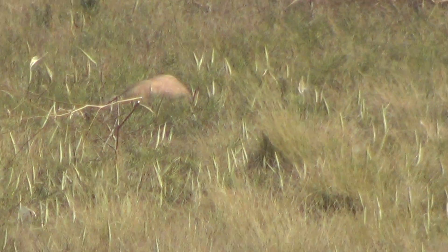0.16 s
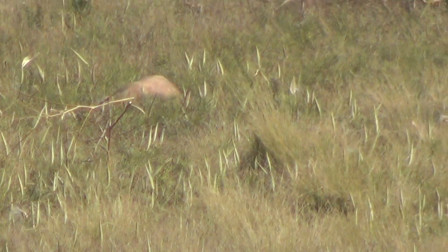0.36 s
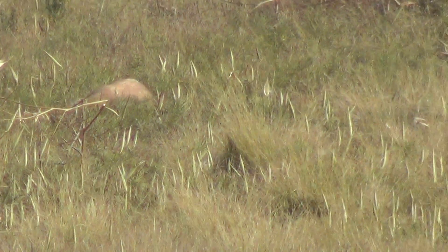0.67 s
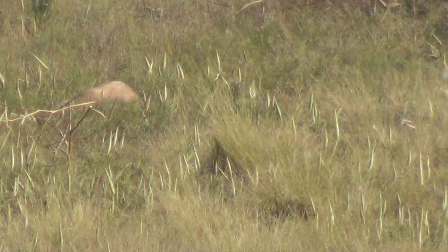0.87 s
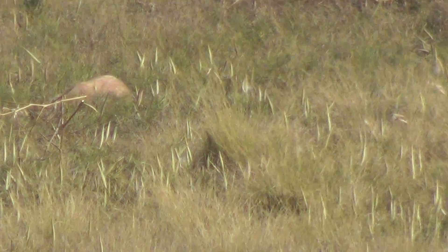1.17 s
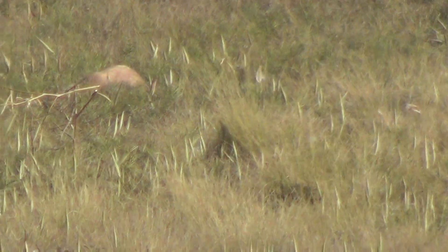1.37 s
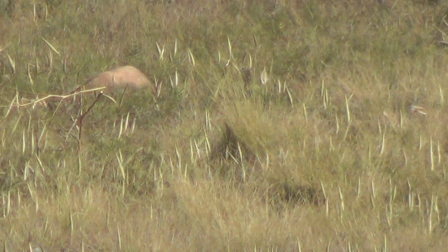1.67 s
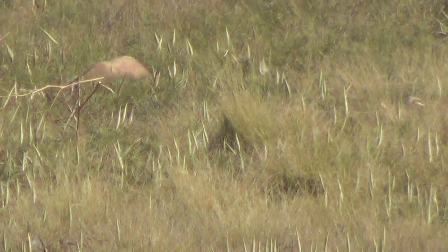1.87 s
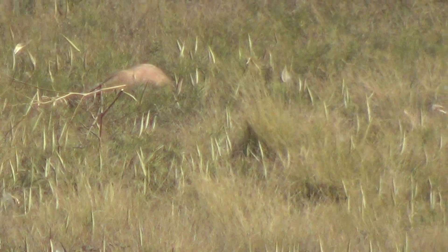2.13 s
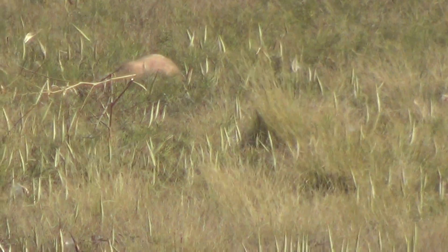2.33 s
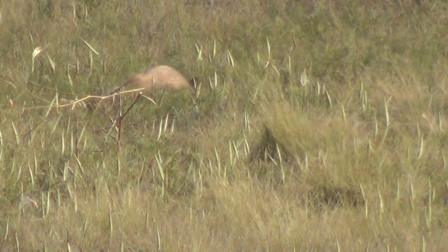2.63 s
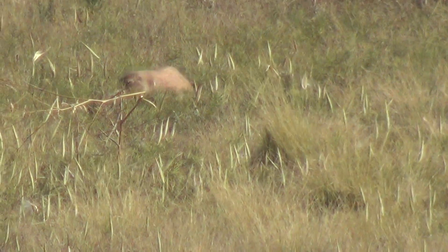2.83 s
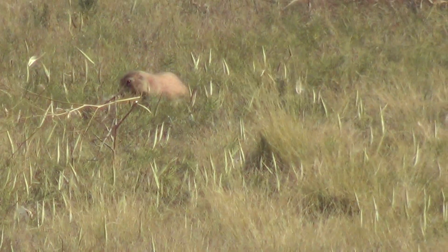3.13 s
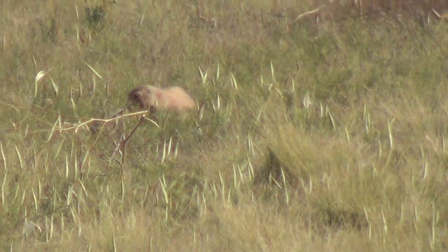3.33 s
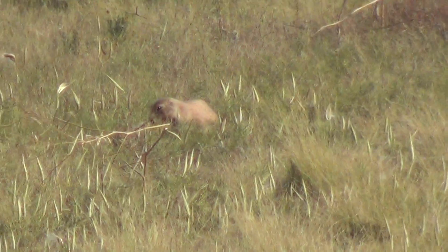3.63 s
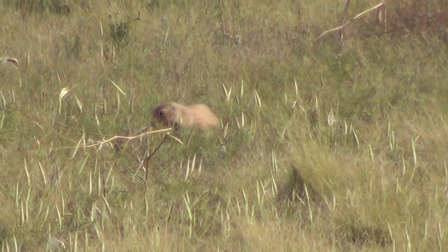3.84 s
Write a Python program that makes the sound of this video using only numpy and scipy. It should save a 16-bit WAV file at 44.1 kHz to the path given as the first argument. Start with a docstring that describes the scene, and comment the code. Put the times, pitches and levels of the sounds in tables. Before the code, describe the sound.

One harsh, arched prairie dog bark over low wind buffeting, faint distant yips and handling clicks

```python
"""Open grassland: gusts buffet the microphone throughout, as low noise over a slowly rising rush of wind.
Two faint arched yips come early from farther off, then the hand-held camera ticks and its grip rubs.
At 2.3 s a prairie dog gives one harsh, arched bark: jittery vocal folds and air through a throat filter.
A farther squeal falls at 2.7 s and a last yip follows; at 3.65 s the camera snaps, one brief high ring.
The camera's own noise hiss and thin high whine run underneath from start to end."""
import sys
import numpy as np
from scipy import signal
from scipy.fft import rfft, irfft
from scipy.io import wavfile
from scipy.ndimage import uniform_filter1d

SR = 44100
rng = np.random.default_rng(int(sys.argv[2]) if len(sys.argv) > 2 else 0)


def wav_out(sig):
    """Save sig, one row per channel (or a flat mono array), as 16-bit PCM at SR to the path in sys.argv[1]."""
    wavfile.write(sys.argv[1], SR, np.round(np.clip(np.atleast_2d(sig).T, -1, 1) * 32767).astype(np.int16))


N = 176400
TIME = np.arange(N) / SR
BIN_HZ = np.arange(N // 2 + 1) * SR / N
CUTOFF_HZ = 16500  # top of the camera's sound


# pitch arch of the near bark: start_s, pitch_hz
BARK_PITCH = [(2.298, 1440), (2.312, 1741), (2.326, 1938), (2.352, 1995), (2.378, 2110), (2.41, 1985),
              (2.427, 1743), (2.44, 1270)]
# effort of the near bark: start_s, level_db, roughness (0-1)
BARK_EFFORT = [(2.296, -74, 0.07), (2.304, -45, 0.28), (2.325, -48, 0.33), (2.345, -46, 0.4),
               (2.356, -46, 0.95), (2.385, -45.5, 0.7), (2.408, -47, 0.65), (2.43, -51.5, 0.37),
               (2.441, -58, 0.3)]
# vocal-fold harmonics of the bark, first to fourth, against each other: level_db
BARK_HARMONICS = [15.5, 2.5, -1, -27]
BARK_PAN_DB = -3  # left minus right


def bark():
    """The near bark: clearer on the way up, harsh and airy at the top of its arch."""
    pitch_hz, = in_time(BARK_PITCH)
    level_db, rough = in_time(BARK_EFFORT)
    call = cry(pitch_hz, level_db, rough, BARK_HARMONICS, BARK_EFFORT[0][0])
    return call * during(BARK_EFFORT) * pan(BARK_PAN_DB)


# throat resonances, as relative tone colour: centre_hz, gain_db
THROAT = [(700, -23), (2100, -4.5), (2900, 11), (3900, 6.5), (5000, -3.5), (6850, 2.5), (7500, -22)]
AIR_DB = -6  # breath noise at full roughness, against the folds, before the throat
# the throat's rasping upper resonance: pitch at the onset, sinking speed, strength at full roughness
UPPER_HZ, UPPER_SAG_HZ_PER_S, UPPER_DB = 6800, 6500, -7.5


def cry(pitch_hz, level_db, rough, harmonics_db, onset_s):
    """Folds and turbulent air sound through the throat; a rasping upper resonance sinks as the call goes on."""
    upper_hz = UPPER_HZ - UPPER_SAG_HZ_PER_S * (TIME - onset_s)
    upper_carrier = np.exp(2j * np.pi * np.cumsum(upper_hz) / SR)
    upper = from_db(UPPER_DB) * np.real(chaos() * upper_carrier)
    breath = from_db(AIR_DB) * rng.standard_normal(N)
    turbulence = np.clip(rough, 0, 1) * (breath + upper)
    sound = colour(voice(pitch_hz, rough, harmonics_db) + turbulence, THROAT)
    # even out the throat's own level, so that the effort curve alone sets it
    running_rms = np.sqrt(uniform_filter1d(sound ** 2, size=400) + 1e-9)
    return from_db(level_db) * sound / running_rms


JITTER, JITTER_HZ = .021, 240  # pitch wander at full roughness (share of the pitch), and its speed
RASP_WIDTH_HZ = 310  # speed of the chaotic wander


def voice(pitch_hz, rough, harmonics_db):
    """Vocal folds: growing roughness breaks harmonics into chaotic bands at their pitch, the upper ones first."""
    rough = np.clip(rough, 0, 1)
    wobble = 1 + JITTER * np.sqrt(rough) * drift(JITTER_HZ)
    phase = 2 * np.pi * np.cumsum(pitch_hz * wobble) / SR
    out = 0
    for k, db in enumerate(harmonics_db, 1):
        broken = rough ** (1 / np.sqrt(k))
        strength = np.sqrt(1 - broken ** 2) + broken * chaos()
        out = out + from_db(db) * np.real(strength * np.exp(1j * k * phase))
    return rms_one(out)


def chaos():
    """Fast random wander of strength and phase; unit power."""
    return rms_one(drift(RASP_WIDTH_HZ) + 1j * drift(RASP_WIDTH_HZ))


# farther squeal that starts hoarse and falls: start_s, pitch_hz, level_db (direct sound), roughness (0-1)
SQUEAL = [(2.725, 1400, -70, .6), (2.752, 1580, -58.5, .8), (2.77, 1600, -57.5, .8), (2.779, 1430, -59, .2),
          (2.81, 1455, -54.5, .12), (2.85, 1380, -60, .2), (2.905, 1260, -66, .2)]
# harmonics of the squeal, first to fourth, against each other: level_db
SQUEAL_HARMONICS = [9, -9, -17, -15]
# distant yips: middle_s, length_s, pitch_hz (at the middle), level_db (direct sound, at the middle)
YIPS = [(.151, .054, 1970, -64), (.666, .032, 1860, -71), (3.243, .046, 1900, -68)]
# harmonics of the yips, first to third, against each other: level_db
YIP_HARMONICS = [1, -1, -17]
# bend of the pitch arch, its downward tilt, roughness (0-1)
YIP_ARCH_PER_S2, YIP_FALL_PER_S, YIP_ROUGH = 165, 2, .25


def far_calls():
    """The falling squeal through the throat, and short arched yips from the bare vocal folds."""
    pitch_hz, level_db, rough = in_time(SQUEAL)
    squeal = cry(pitch_hz, level_db, rough, SQUEAL_HARMONICS, SQUEAL[0][0]) * during(SQUEAL)
    yip_hz, yip_gain = np.zeros(N), np.zeros(N)
    for middle_s, length_s, middle_hz, db in YIPS:
        age = TIME - middle_s
        along = np.clip(2 * age / length_s, -1, 1)  # -1 at the start, 1 at the end
        arch = 1 - YIP_ARCH_PER_S2 * age ** 2 - YIP_FALL_PER_S * age
        yip_hz += (np.abs(along) < 1) * middle_hz * arch
        yip_gain += from_db(db) * np.sqrt(1 - along ** 2)
    return squeal + yip_gain * voice(yip_hz, YIP_ROUGH, YIP_HARMONICS)


SCATTER_S, SCATTER_DB = .008, -11  # decay constant of the tail, its strength against the direct sound


def grass(x):
    """The direct sound and a brief noise-like tail scattered by the ground."""
    age = TIME[:SR // 10]
    tail = rng.standard_normal(len(age)) * np.exp(-age / SCATTER_S)
    return x + from_db(SCATTER_DB) * signal.fftconvolve(x, tail / np.linalg.norm(tail))[:N]


# one bright snap and its rebound: start_s, level_db (height of the ring without rattle, before panning)
SNAPS = [(3.6456, -20.5), (3.656, -40)]
SNAP_HZ, SNAP_WIDTH_HZ, SNAP_PAN_DB = 10650, 2300, 4.5  # pan: left minus right
SNAP_RATTLE_DB, SNAP_RATTLE_S = -29, 0.0047  # rattle against the contact, and its decay constant


def snap():
    """A hard contact and its rattle excite one brief, very high resonance."""
    start_s, level_db = np.transpose(SNAPS)
    age = TIME[:SR // 20]
    rise = np.pi * SNAP_WIDTH_HZ * age
    ping = rise * np.exp(1 - rise) * np.sin(2 * np.pi * SNAP_HZ * age)
    rattle = from_db(SNAP_RATTLE_DB) * rng.standard_normal(len(age)) * np.exp(-age / SNAP_RATTLE_S)
    one_snap = np.convolve((age == 0) + rattle, ping)
    hits = clicks(start_s, from_db(level_db))
    return signal.fftconvolve(hits, one_snap)[:N] * pan(SNAP_PAN_DB)


# ticks of the camera's shell: start_s, level_db (3 dB above the rms of its 10 ms, before panning), centre_hz
TICKS = [(.7265, -62, 4250), (.735, -64, 4200), (1.206, -62, 2600), (1.281, -59, 2620),
         (1.331, -61.5, 3000), (1.354, -58.5, 1980), (1.394, -60, 1900), (1.442, -55.5, 2300),
         (1.483, -48, 1220), (1.5076, -48, 1380), (1.544, -60, 6400), (2.242, -56.5, 4450),
         (2.2752, -55.5, 11000), (2.305, -62, 11500), (2.6578, -58.5, 5700), (3.088, -60, 3800),
         (3.097, -56, 2140), (3.103, -47, 1700), (3.124, -51, 2310), (3.6328, -46.5, 1820),
         (3.639, -41.5, 1470), (3.6555, -51.5, 2070)]
# modes of the plastic shell: pitch_hz
SHELL_HZ = [1050, 1850, 2900, 4100, 5700, 8300, 12500]
SHELL_T60_S = .003  # time for a mode to ring down by 60 dB
TICK_FALL_DB_PER_OCTAVE = 12  # how fast modes fade away from the tick's centre
TICK_GRIT, TICK_GRIT_S = .5, .002  # grit against the first click, and its decay constant


def ticks():
    """Gritty contacts ring the camera's plastic shell, each favouring the modes near its own pitch."""
    out, age = np.zeros(N), TIME[:SR // 100]
    for start_s, level_db, centre_hz in TICKS:
        grit = TICK_GRIT * rng.standard_normal(len(age)) * np.exp(-age / TICK_GRIT_S)
        contact = (age == 0) + grit
        tick = 0
        for mode_hz in SHELL_HZ:
            octaves_off = abs(np.log2(mode_hz / centre_hz))
            mode_gain = from_db(-TICK_FALL_DB_PER_OCTAVE * octaves_off)
            tick = tick + mode_gain * ring(contact, mode_hz, SHELL_T60_S)
        tick = signal.lfilter(*signal.butter(1, min(2 * centre_hz, CUTOFF_HZ), fs=SR), tick)
        start = int(start_s * SR)
        out[start:start + len(age)] += from_db(level_db) * rms_one(tick) / np.sqrt(2)
    return out


# the grip rubbing: middle_s, half_length_s, level_db (at the middle, before panning), centre_hz
RUBS = [(1.484, 0.026, -58.5, 1280), (1.57, 0.059, -62, 5700), (2.268, 0.017, -61, 4500),
        (3.111, 0.046, -61.5, 7040)]
RUB_GRAINS_PER_S = 2600


def rubbing():
    """The grip slides in dense, fine slips, dull or hissy."""
    out = 0
    for middle_s, half_length_s, level_db, centre_hz in RUBS:
        slips = (rng.random(N) < RUB_GRAINS_PER_S / SR) * rng.standard_normal(N)
        edges_hz = [centre_hz / 2, min(centre_hz * 2, CUTOFF_HZ)]
        band = signal.butter(1, edges_hz, "band", fs=SR, output="sos")
        swell = swells([(middle_s, half_length_s, level_db)])
        out = out + rms_one(signal.sosfilt(band, slips)) * swell
    return out


HANDLING_PAN_DB = -2.5  # left minus right


def handling():
    """Ticks and rubbing of the hand on the camera."""
    return (ticks() + rubbing()) * pan(HANDLING_PAN_DB)


# gusts on the microphone, before flutter and bass change: start_s, level_db
GUSTS = [(0, -66), (.2, -52.5), (.36, -65), (.62, -66), (.8, -61.5), (.97, -64), (1.2, -49.5), (1.42, -61),
         (1.6, -50), (1.8, -61), (1.92, -43), (2.2, -44), (2.36, -54.5), (2.58, -58), (2.7, -50.5),
         (2.92, -45.5), (3.12, -57.5), (3.38, -59), (3.5, -40), (3.64, -38.5), (3.8, -43.5), (4, -39.5)]
# soft bumps in the buffeting, before the bass change: middle_s, level_db
BUMPS = [(0.431, -57), (0.696, -49.5), (1.194, -55), (1.356, -42), (1.465, -48.5), (1.565, -45.5),
         (2.671, -41.5), (3.63, -37)]
BUMP_WIDTH_S = 0.023  # half length
# relative tone colour of the buffeting: centre_hz, gain_db
BUFFET = [(25, -41), (90, -3.5), (150, 1), (240, 0), (350, -3.5), (520, -11), (3000, -72)]
# likeness: how alike left and right are, 0-1
BUFFET_FLUTTER_DB, BUFFET_FLUTTER_HZ, BUFFET_LIKENESS = 2.23, 22.4, 0.91
# gain of the buffeting's deep bass, which thins out late on: start_s, gain_db
BASS_GAIN = [(2.9, -0.5), (3.6, -18)]
BASS_HZ = 140


def buffeting():
    """Gusts push on the microphone as low, fluttering noise with soft bumps."""
    gust_db, = in_time(GUSTS)
    push = from_db(gust_db + BUFFET_FLUTTER_DB * drift(BUFFET_FLUTTER_HZ))
    bumps = swells([(middle_s, BUMP_WIDTH_S, db) for middle_s, db in BUMPS])
    buffet = air(BUFFET, BUFFET_LIKENESS) * np.hypot(push, bumps)
    bass = irfft(rfft(buffet) / (1 + (BIN_HZ / BASS_HZ) ** 4), N)
    bass_gain = from_db(in_time(BASS_GAIN)[0])
    return buffet + bass * (bass_gain - 1)


# rise of the steady rush, before the RUSH_DB trim: start_s, level_db
RUSH_LEVEL = [(0, -63.5), (1, -62.5), (1.6, -55.5), (3.3, -51.5), (3.7, -48.5)]
# relative tone colour of the rush: centre_hz, gain_db
RUSH = [(40, -12.5), (300, -10), (800, 1.5), (1050, -3.5), (1300, -3.5), (1700, -9.5), (4600, -29),
        (9000, -30.5)]
# side of the rush by pitch: centre_hz, left_minus_right_db
RUSH_PAN = [(220, -4.5), (650, 11.5), (4400, -1.5)]
RUSH_DB, RUSH_LIKENESS = -1.5, 0.93  # trim; likeness of the sides before panning, 0-1


def rush():
    """The smooth rush of wind: noise that slowly swells, leaning left in its middle pitches."""
    level_db, = in_time(RUSH_LEVEL)
    noise = air(RUSH, RUSH_LIKENESS)
    panned = irfft(rfft(noise) * pan(per_bin(RUSH_PAN)), N)
    return panned * from_db(RUSH_DB + level_db)


def from_db(db):
    """Decibels to gain."""
    return 10 ** (np.asarray(db) / 20)


def rms_one(x):
    """Scale to unit power."""
    return x / np.sqrt(np.mean(np.abs(x) ** 2) + 1e-20)


def in_time(rows):
    """Each column of a curve at every sample."""
    s, *columns = np.transpose(rows)
    return [np.interp(TIME, s, c) for c in columns]


def during(rows):
    """Open from a curve's first point to its last, with soft edges."""
    inside = (TIME > rows[0][0]) & (TIME < rows[-1][0])
    return uniform_filter1d(1. * inside, size=200)


def swells(rows):
    """Bell-shaped swells from (middle_s, half_length_s, level_db)."""
    return sum(from_db(db) * np.exp(-((TIME - s) / width) ** 2) for s, width, db in rows)


def clicks(times, gains):
    """Single impulses at the given times."""
    out = np.zeros(N)
    out[(np.asarray(times) * SR).astype(int)] = gains
    return out


def ring(clicks, hz, t60):
    """A unit click sets a cosine of height 1 ringing."""
    r, w = np.exp(-np.log(1000) / (t60 * SR)), 2 * np.pi * hz / SR
    return signal.lfilter([1, -r * np.cos(w)], [1, -2 * r * np.cos(w), r * r], clicks + 1e-18)


def pan(db):
    """Left and right gains, averaging 1, for a level difference."""
    sides = from_db(np.array([[.5], [-.5]]) * db)
    return sides / np.cosh(np.log(10) * np.asarray(db) / 20 / 2)


def per_bin(points):
    """A (Hz, value) table at every frequency."""
    hz, value = np.transpose(points)
    return np.interp(np.log(BIN_HZ + 1), np.log(hz), value)


def colour(x, points):
    """Filter by a (Hz, dB) table."""
    return irfft(rfft(x) * from_db(per_bin(points)), N)


def drift(hz):
    """Random wander up to about hz; spread 1."""
    return rms_one(irfft(rfft(rng.standard_normal(N)) / np.hypot(1, (BIN_HZ / hz) ** 2), N))


def air(spectrum, likeness):
    """Coloured stereo noise of unit power, partly shared by both sides."""
    mid, side = rng.standard_normal((2, N))
    c = np.clip(likeness, 0, 1)
    stereo = np.sqrt(1 + c) * mid + np.sqrt(1 - c) * side * [[1], [-1]]
    return rms_one(colour(stereo, spectrum))


def scene():
    """Animals, the hand on the camera, and wind."""
    return bark() + grass(far_calls()) + snap() + handling() + buffeting() + rush()


# relative tone colour of the camera's hiss: centre_hz, gain_db
HISS = [(2000, -0.5), (16000, -3.5)]
HISS_DB, HISS_LIKENESS = -69.5, 0.89  # likeness of the sides, 0-1
# the whine's level before its breaks; each break lasts a share of its cycle
WHINE_HZ, WHINE_DB, WHINE_BREAKS_PER_S, WHINE_BREAK_SHARE = 15734, -65.3, 60, .08


def record(dry):
    """The camera adds hiss and a thin whine that buzzes with regular breaks, and cuts the top."""
    unbroken = (TIME * WHINE_BREAKS_PER_S) % 1 > WHINE_BREAK_SHARE
    gate = uniform_filter1d(1. * unbroken, size=40)
    whine = from_db(WHINE_DB) * np.sqrt(2) * np.sin(2 * np.pi * WHINE_HZ * TIME) * gate
    hiss = from_db(HISS_DB) * air(HISS, HISS_LIKENESS)
    top_cut = signal.ellip(10, .1, 70, CUTOFF_HZ, fs=SR, output="sos")
    return signal.sosfilt(top_cut, dry + whine + hiss)


dry = scene()
out = record(dry)
wav_out(out)
```